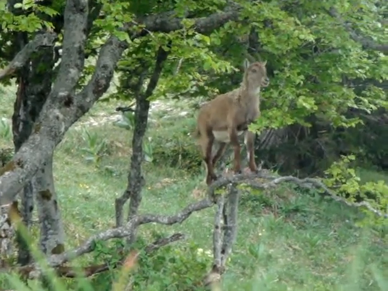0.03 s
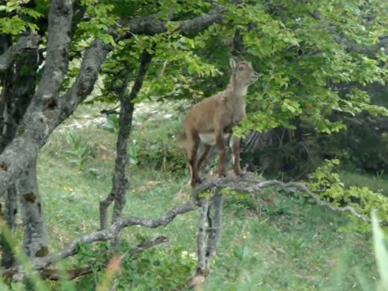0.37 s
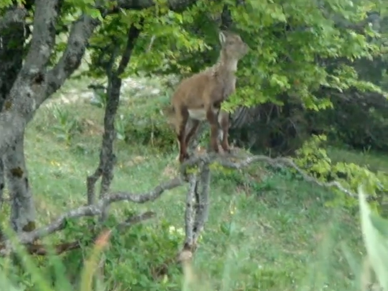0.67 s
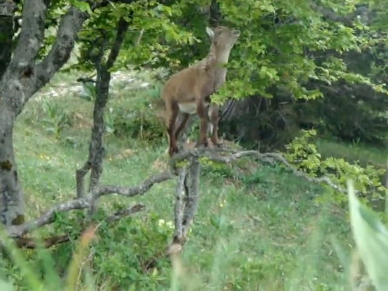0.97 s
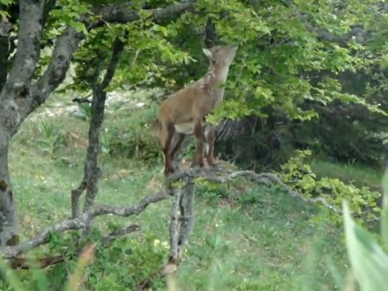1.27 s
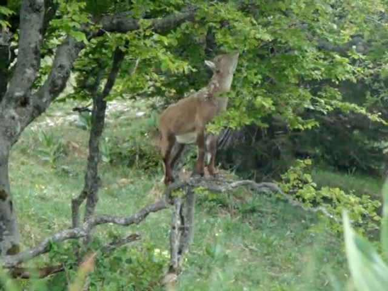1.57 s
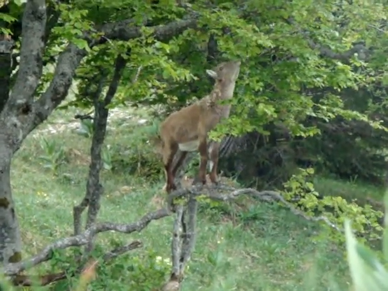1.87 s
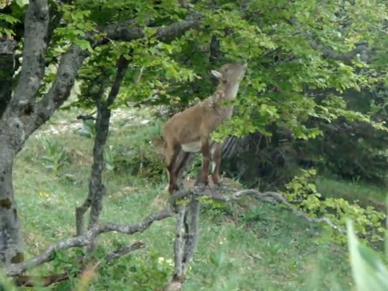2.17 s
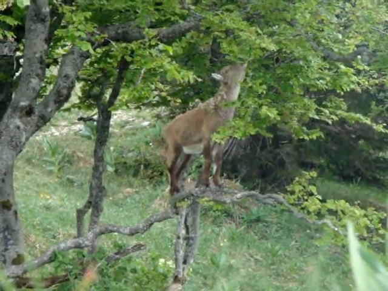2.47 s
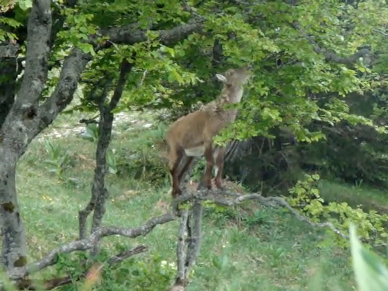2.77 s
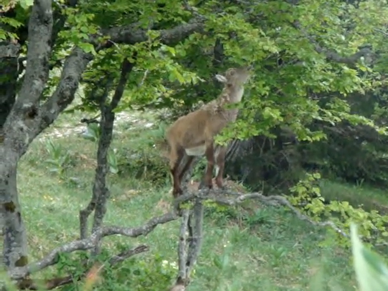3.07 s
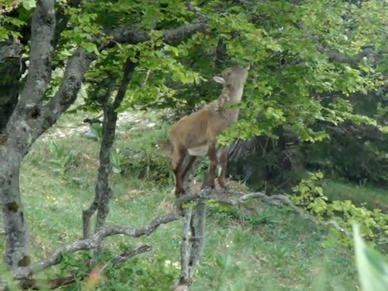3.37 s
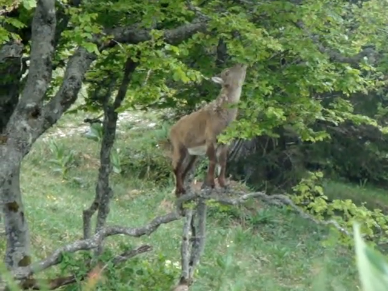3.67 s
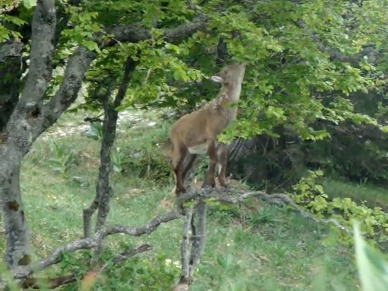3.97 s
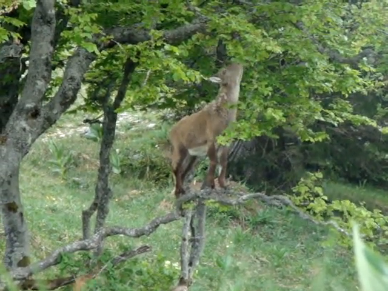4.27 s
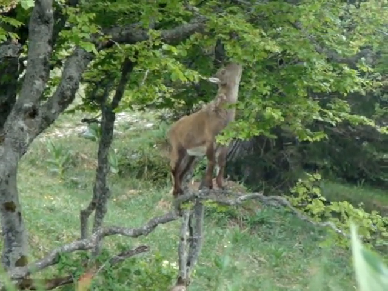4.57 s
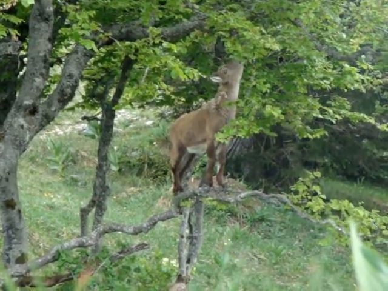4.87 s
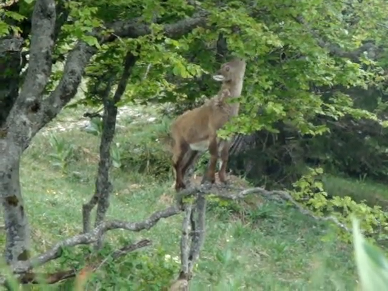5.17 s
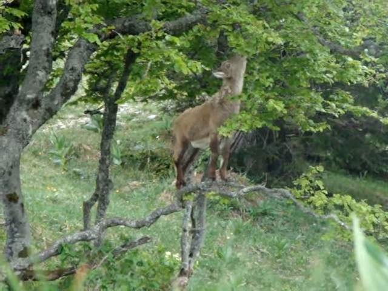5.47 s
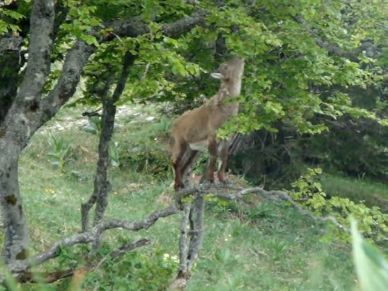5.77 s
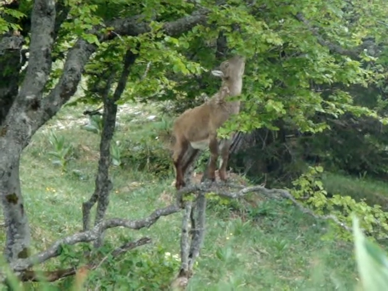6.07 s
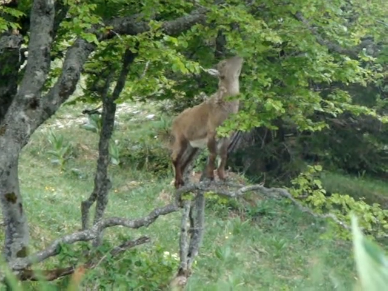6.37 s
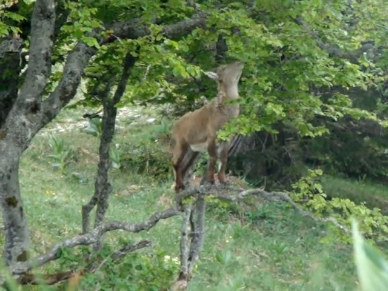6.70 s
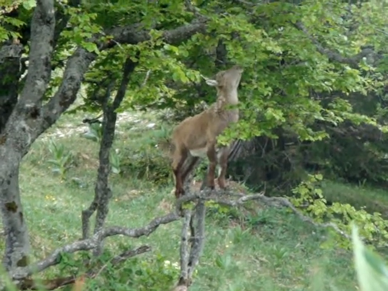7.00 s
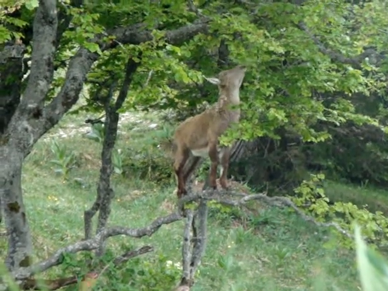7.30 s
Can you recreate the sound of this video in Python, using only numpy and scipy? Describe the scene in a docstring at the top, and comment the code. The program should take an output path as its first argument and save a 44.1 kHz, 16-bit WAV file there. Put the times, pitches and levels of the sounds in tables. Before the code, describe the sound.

A songbird sings at a wooded meadow's edge, its notes echoing lightly among the trees. In the first half second it gives two short, high held notes with a thin buzz between them. From 0.6 to 2.7 seconds come six clear rising whistles. Close to the microphone, a camera's zoom motor ticks rapidly and softly from the start, stopping at about 2 seconds. Faint, thin calls of distant birds come now and then, mostly in the lull between 3 and 4.5 seconds. After soft twitters near 5.1 seconds, the songbird sings six quick, high, hooked syllables from 5.3 to 6.3 seconds, running straight into six faster falling chips until 7 seconds, then one faint twitter. A few soft knocks fall around 0.6, 2 and 5 seconds. A soft, steady rush of air and a very faint camera whirr continue throughout.

```python
"""A songbird sings at the edge of a mountain meadow, its breath driving the labia of its syrinx into
oscillation: two held notes around a buzz, six rising whistles, six hooked syllables, six falling chips.
A trunk reflects the song and the wood scatters it; other birds call faintly among the trees.
A camera's zoom motor ticks for two seconds, exciting the modes of the lens barrel. Beneath it all,
in mono, lie a few soft knocks, a steady rush of air and the camera's own whirr."""
import sys
import numpy as np
from scipy import signal
from scipy.fft import rfft, irfft, next_fast_len
from scipy.io import wavfile
from scipy.ndimage import map_coordinates

SR = 44100
rng = np.random.default_rng(int(sys.argv[2]) if len(sys.argv) > 2 else 0)


def digitize_waveform(pressure):
    """Quantize a signal to 16-bit integers and store it at the path in sys.argv[1].

    Rows of a 2-D input are taken as channels; values are limited to [-1, 1].
    """
    field = np.atleast_2d(pressure).T
    bounded = np.clip(field, -1, 1)
    quanta = np.round(bounded * 32767).astype(np.int16)
    wavfile.write(sys.argv[1], SR, quanta)


N = 332509

# Held notes. Each row: start in seconds, length in seconds, pitch in Hz, peak level in dB.
HELD_NOTES = [(0.0895, 0.073, 3927, -33.5), (0.393, 0.084, 3904, -33.5)]
# The scoop into a held note, and the slide that the other side of the syrinx sings ahead of it.
# Each row: time from the note's start in seconds, pitch in Hz, level relative to the note in dB.
LEAD_SCOOP = [(-.031, 2620, -23), (-.022, 2850, -18), (-.008, 3120, -11.5)]
SLIDE = [(-.035, 2840, -17), (-.021, 3600, -12), (-.008, 4150, -16)]

def held_notes():
    """Two-voice phonation: one side scoops up, holds, swells and sags; the other slides up ahead."""
    swell_s, swell_db = .047, 4.2
    release_s, release_db, sag_hz = .024, 8, 90
    song = np.zeros(N)
    for start, length, hz, db in HELD_NOTES:
        t = np.arange(0, length, .001)
        swell = ramp(t / swell_s)
        release = ramp(1 - (length - t) / release_s)
        level = db - swell_db * (1 - swell) - release_db * release ** 2
        hold = np.transpose([start + t, hz - sag_hz * release, level])
        add(song, *pure(np.vstack([placed(LEAD_SCOOP, start, db), hold])))
        add(song, *raspy(placed(SLIDE, start, db)))
    return song


# Rising whistles. Each row: start in seconds, length in seconds, lower and upper pitch limits in Hz,
# fraction of the length at which the rise is steepest, crest level in dB.
WHISTLES = [(0.585, 0.225, 2678, 3777, 0.45, -36.7), (0.92, 0.233, 2629, 3725, 0.4, -42.6),
            (1.26, 0.26, 2486, 3727, 0.36, -39.8), (1.63, 0.285, 2539, 3758, 0.4, -39.8),
            (2.025, 0.3, 2448, 3743, 0.33, -40.8), (2.445, 0.297, 2567, 3836, 0.49, -40.3)]

def whistles():
    """Frequency sweep along an S-curve: each whistle catches at one pitch, then goes on louder."""
    rise_share, crest_lag = .144, .31  # fractions of the length
    break_hz, break_width_hz, sag_hz, break_db = 3140, 80, 50, 3
    swell_db, ease_db, drift_hz, drift_db = 6.5, 6, 10, .7
    attack_s, release_s, edge_db = .031, .018, 11
    song = np.zeros(N)
    for start, length, low_hz, high_hz, steepest, db in WHISTLES:
        t = np.arange(int(length * SR)) / SR
        progress = t / length
        sweep = low_hz + (high_hz - low_hz) / (1 + np.exp((steepest - progress) / rise_share))
        past_break = (sweep - break_hz) / break_width_hz
        pitch = sweep - sag_hz * np.exp(-past_break ** 2) + drift_hz * wobble(50, len(t))
        crest = steepest + crest_lag
        swell = swell_db * ramp(1 - progress / crest) + break_db * ramp(-past_break)
        ease = ease_db * ramp((progress - crest) / (1 - crest)) ** 2
        edges = edge_db * (ramp(1 - t / attack_s) + ramp(1 - (length - t) / release_s) ** 2)
        level = db - swell - ease - edges + drift_db * wobble(44.7, len(t))
        add(song, *pure(np.transpose([start + t, pitch, level])))
    return song


# Clicking notes that open the buzz.
# Each row: start in seconds, first and last pitch in Hz, length in seconds, level in dB.
PIPS = [(.2095, 4900, 5530, 0.0034, -45), (.2148, 6070, 6500, .004, -40), (.2205, 4800, 5500, .004, -46)]
# High buzzing notes, one contour per voice. Each row: time in seconds, pitch in Hz, level in dB.
BUZZ_VOICES = [
    [(0, 5380, -37.5), (.007, 5000, -42), (.012, 4950, -51.5)],
    [(.228, 4250, -50.5), (.235, 5400, -46.5), (.239, 6050, -35.5), (.247, 6500, -39.5),
     (.254, 5950, -35.5), (.260, 6050, -38.5), (.265, 6600, -38.5), (.271, 6150, -40), (.281, 5830, -38),
     (.285, 6450, -51), (.297, 5820, -40), (.309, 5100, -41)],
    [(.224, 5950, -41.5), (.228, 6240, -37.5), (.233, 6900, -60), (.256, 6750, -45.5), (.302, 6250, -54)],
]

def buzz():
    """Beating: where they overlap, the two unsteady sides of the syrinx interfere in a buzz."""
    song = np.zeros(N)
    for row in PIPS:
        add(song, *pure(glide(*row)))
    for contour in BUZZ_VOICES:
        add(song, *syrinx(contour, waver=.022, shimmer_db=2.5, rate=540))
    return song


# Soft twitters before and after the fast runs.
# Each row: start in seconds, first and last pitch in Hz, length in seconds, level in dB.
TWITTERS = [(5.087, 3700, 5000, .016, -56), (5.23, 4900, 5640, .03, -55.5),
            (7.13, 2550, 3080, 0.066, -57.5)]

def twitters():
    """Deep random frequency modulation spreads short rising glides into twitters."""
    song = np.zeros(N)
    for row in TWITTERS:
        add(song, *syrinx(glide(*row), waver=.06, shimmer_db=2.5, rate=300))
    return song


# The four parts of a hooked syllable.
# Each row: time from the syllable's centre in seconds, nominal pitch in Hz, relative level in dB.
HOOK = [(-.085, 5800, -10), (-.080, 6500, -7), (-.072, 7400, -28), (-.063, 6600, -9), (-.059, 5850, -3),
        (-.049, 5050, -3), (-.043, 3600, -9)]
SCOOP = [(-.031, 2620, -14), (-.020, 2720, -9), (-.014, 2870, .5), (-.006, 3120, -1), (-.001, 3220, -12),
         (.014, 3200, -15)]
FLICK = [(-.004, 3320, -11), (.002, 3700, 0), (.007, 4150, -6), (.013, 4700, -7), (.018, 3100, -12)]
TAIL = [(.020, 3100, -13), (.024, 3720, 0), (.035, 3700, -.5), (.041, 3690, -6)]
# Syllables. Each row: centre in seconds, gains of hook, scoop, flick and tail in dB, tail pitch ratio.
SYLLABLES = [(5.401, -56, -47, -40.5, -50.5, 1.02), (5.586, -47.5, -41.5, -40.5, -41.5, 0.995),
             (5.767, -43.5, -40, -37.5, -36.5, 1.012), (5.948, -47.5, -39, -41.5, -41.5, 0.97),
             (6.127, -50, -44, -42.5, -40.5, .995), (6.304, -49, -45.5, -39, -41.5, 0.99)]

def hooked_syllables():
    """Alternating phonation: each syllable passes between the two sides of the syrinx."""
    song = np.zeros(N)
    for centre, hook_db, scoop_db, flick_db, tail_db, ratio in SYLLABLES:
        add(song, *raspy(placed(HOOK, centre, hook_db)))
        add(song, *pure(placed(SCOOP, centre, scoop_db)))
        add(song, *raspy(placed(FLICK, centre, flick_db)))
        add(song, *pure(placed(TAIL, centre, tail_db, ratio)))
    return song


# One chip. Each row: time from its accent in seconds, nominal pitch in Hz, relative level in dB.
CHIP_SHAPE = [(-.011, 3700, -15), (-.006, 3250, -8), (-.003, 3050, -1), (.001, 2870, 1.5), (.005, 2670, -3),
              (.009, 2480, -13), (.028, 1850, -18)]
# The run of chips. Each row: accent time in seconds, gain in dB, pitch ratio,
# then the grace note's lead in seconds, pitch in Hz and gain in dB.
CHIPS = [(6.428, -44, 0.96, .028, 3780, -48), (6.546, -42.5, 0.99, .026, 3850, -48.5),
         (6.659, -41.5, .99, 0.026, 3850, -49.5), (6.762, -43, 0.99, 0.025, 3850, -45),
         (6.856, -42, 1.01, .024, 3920, -46.5), (6.961, -42.5, 1.01, 0.022, 3980, -49)]

def chips():
    """A steep downward frequency sweep is heard as a chip; a short grace note precedes each."""
    song = np.zeros(N)
    for accent, db, ratio, lead, grace_hz, grace_db in CHIPS:
        grace = [(-.005, grace_hz, -4), (0, grace_hz, 1), (.006, .97 * grace_hz, -6)]
        add(song, *pure(placed(grace, accent - lead, grace_db)))
        add(song, *raspy(placed(CHIP_SHAPE, accent, db, ratio)))
    return song


def syrinx(contour, waver, shimmer_db, rate):
    """Self-sustained oscillation, its phase the integral of pitch. Returns start time and sound."""
    times, hz, db = np.transpose(contour)
    times = np.sort(times)
    t = times[0] + np.arange(max(int((times[-1] - times[0]) * SR), 8)) / SR
    pitch = np.interp(t, times, hz) * (1 + waver * wobble(rate, len(t)))
    level = amp(np.interp(t, times, db) + shimmer_db * wobble(rate, len(t)))
    from_edge = np.minimum(t - t[0], t[-1] - t)
    gate = np.sin(np.pi / 2 * ramp(from_edge / .0012)) ** 2
    return times[0], gate * level * np.sin(2 * np.pi * np.cumsum(pitch) / SR)


def pure(contour):
    """Nearly periodic oscillation: the labia vibrate evenly and give a clean tone."""
    return syrinx(contour, waver=.0028, shimmer_db=.55, rate=200)


def raspy(contour):
    """Random modulation: in a steep glide the vibration turns unsteady and the tone roughens."""
    return syrinx(contour, waver=.021, shimmer_db=2.1, rate=450)


def trunk_echo(x, delay_s):
    """Reflection: a nearby trunk returns the sound, delayed by the longer path."""
    return filtered(x, lambda f: np.exp(-2j * np.pi * f * delay_s))


def trees(x, t60_s):
    """Multiple scattering: trunks and leaves spread a sound into an exponentially fading tail."""
    t = np.arange(SR) / SR
    build_up = 1 - np.exp(-t / .014)
    tail = rng.standard_normal(SR) * amp(-60 * t / t60_s) * build_up
    return signal.fftconvolve(x, tail / np.linalg.norm(tail))[:N]


# Distant calls. Each row: start in seconds, first and last pitch in Hz, length in seconds,
# level before scattering in dB.
FAR_CALLS = [(1.005, 4870, 4600, .1, -62), (1.98, 7100, 6400, .07, -64), (3.038, 5080, 4470, 0.12, -63.5),
             (3.243, 5900, 5620, .07, -64.5), (3.88, 7000, 8100, .08, -64.5), (4.296, 4750, 5000, .09, -62),
             (4.473, 4780, 5080, 0.074, -62)]

def far_birds():
    """Diffuse sound: thin, quavering calls arrive only by scattering through the wood."""
    calls = np.zeros(N)
    for row in FAR_CALLS:
        add(calls, *syrinx(glide(*row), waver=.04, shimmer_db=2, rate=200))
    return trees(calls, t60_s=.2)


# Modes of the lens barrel. Each row: frequency in Hz, relative level in dB.
BARREL_MODES = [(370, -10.5), (690, -9), (1310, -2), (1440, -4), (1680, -8.5), (1920, -4)]

def barrel_tick(db):
    """Modal ringing: after a soft blow the barrel's modes swell and die within milliseconds."""
    t = np.arange(SR // 40) / SR
    rise_s = .0021
    ring = sum(amp(level + rng.normal(0, 1)) * np.sin(2 * np.pi * (hz * t + rng.random()))
               for hz, level in BARREL_MODES)
    return amp(db) * ring * t / rise_s * np.exp(1 - t / rise_s)


# Heavy catches of the motor, each taken at the nearest step. Each row: time in seconds, tick gain in dB.
MOTOR_CATCHES = [(.046, -48.5), (.114, -47), (.28, -48), (.382, -47.5), (.449, -47.5), (.748, -48),
                 (.814, -45.5), (.979, -44), (1.046, -47), (1.149, -47.5), (1.281, -47), (1.413, -44),
                 (1.547, -48), (1.915, -49)]

def zoom_motor():
    """Periodic impacts: strong and weak steps alternate on the barrel, over gear noise at its modes."""
    first_s, end_s, steps_per_s = .0125, 2.07, 59.94
    strong_db, weak_db, scatter_db = -53.5, -60.5, 3.5
    times = np.arange(first_s, end_s, 1 / steps_per_s)
    levels = np.resize([strong_db, weak_db], len(times)) + scatter_db * rng.standard_normal(len(times))
    for time, db in MOTOR_CATCHES:
        levels[np.argmin(abs(times - time))] = db
    ticks = np.zeros(N)
    for time, db in zip(times, levels):
        add(ticks, time, barrel_tick(db))
    running = ramp((end_s - clock()) / .02)
    gears = sum(amp(level) * band(hz, 190) for hz, level in BARREL_MODES)
    return ticks + amp(-68) * running * gears


# Small knocks, scuffs and a low swell. Each row: centre time in seconds, frequency in Hz,
# nominal bandwidth in Hz, envelope standard deviation in seconds, rms level at the crest in dB.
KNOCKS = [(.547, 2450, 600, .003, -52), (.622, 1360, 200, .011, -48.5), (2.047, 1900, 1200, .002, -51),
          (2.402, 2250, 400, .003, -57), (5.02, 420, 130, .014, -60), (5.085, 420, 200, .008, -57.5),
          (7.18, 140, 30, .1, -72)]

def knocks():
    """Band-limited transients: noise under a Gaussian envelope has no sharp onset and sounds dull."""
    return sum(amp(db) * np.exp(-.5 * ((clock() - centre) / spread) ** 2) * band(hz, width)
               for centre, hz, width, spread, db in KNOCKS)


# Spectrum of the air's rush. Each row: frequency in Hz, relative spectral density in dB.
AIR_SPECTRUM = [(20, -21.5), (60, -12), (140, -4.5), (480, -1.5), (900, -3), (1300, -4), (1700, -6.5),
                (3400, -7), (4200, -6), (4700, -9), (10000, -13.5)]

def air():
    """Stationary broadband noise: a soft rush, strongest in the low middle range, thinning to hiss."""
    hz, db = np.transpose(AIR_SPECTRUM)
    rush = filtered(rng.standard_normal(N), lambda f: amp(np.interp(np.log(f + 1), np.log(hz), db)))
    return amp(-56) * unit(rush)


# Bands of the camera's whirr. Each row: frequency in Hz, nominal bandwidth in Hz, rms level in dB,
# flutter depth in dB, flutter rate in knots per second.
WHIRR_BANDS = [(1290, 130, -70.5, 5.5, 25), (3950, 140, -66.5, 6.5, 50)]

def camera_whirr():
    """Amplitude modulation: narrow bands of noise flutter at random in level."""
    return sum(band(hz, width) * amp(db) * unit(amp(flutter_db * np.tanh(wobble(rate, N))))
               for hz, width, db, flutter_db, rate in WHIRR_BANDS)


def glide(start, first_hz, last_hz, length, db):
    """The contour of a linear sweep at an even level."""
    return [(start, first_hz, db), (start + length, last_hz, db)]


def placed(shape, time, db, ratio=1):
    """A contour shifted in time and level, and transposed by a pitch ratio."""
    return np.array(shape) * [1, ratio, 1] + [time, 0, db]


def add(track, time, sound):
    """Superpose a sound on the track from a time in seconds."""
    start = max(round(time * SR), 0)
    track[start:start + len(sound)] += sound[:max(N - start, 0)]


def resonance(f, hz, width):
    """Frequency response of a damped harmonic oscillator."""
    return 1j * f * width / (hz * hz - f * f + 1j * f * width)


def band(hz, width):
    """Resonant filtering: noise passed twice through one damped mode, scaled to rms 1."""
    return unit(filtered(rng.standard_normal(N), lambda f: resonance(f, hz, 1.7 * width) ** 2))


def filtered(x, response):
    """Linear filtering: the spectrum of x times a complex frequency response."""
    size = next_fast_len(N + SR // 2)
    return irfft(rfft(x, size) * response(np.fft.rfftfreq(size, 1 / SR)), size)[:N]


def wobble(rate, size):
    """A smooth random curve with rate knots per second."""
    knots = rng.standard_normal(int(size * rate / SR) + 4)
    return map_coordinates(knots, [np.arange(size) * rate / SR], mode="mirror")


def amp(db):
    """Decibels to gain."""
    return 10 ** (np.asarray(db) / 20)


def unit(x):
    """Scale to rms 1."""
    return x / np.sqrt(np.mean(x ** 2) + 1e-20)


def ramp(x):
    """Zero below 0, one above 1, linear in between."""
    return np.clip(x, 0, 1)


def clock():
    """The time of every sample in seconds."""
    return np.arange(N) / SR


def scene():
    """Superposition at one microphone: direct, reflected and scattered song over the background."""
    bird = held_notes() + whistles() + buzz() + twitters() + hooked_syllables() + chips()
    trunk = amp(-21) * trunk_echo(bird, delay_s=.017)
    dulled = filtered(bird, lambda f: 1 / (1 + (f / 5000) ** 6))  # the wood returns little treble
    wood = amp(-15.5) * trees(dulled, t60_s=.53)
    mono = bird + trunk + wood + far_birds() + zoom_motor() + knocks() + air() + camera_whirr()
    return np.array([mono, mono])


def record(dry):
    """Band limiting: an ideal low-pass filter passes nothing above its cutoff."""
    cutoff_hz = 10100
    return np.array([filtered(channel, lambda f: f < cutoff_hz) for channel in dry])


dry = scene()
out = record(dry)
digitize_waveform(out)
```